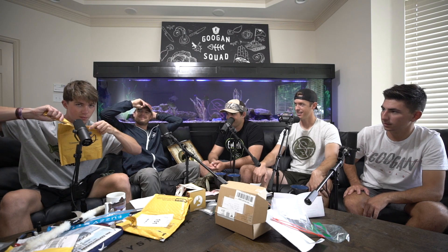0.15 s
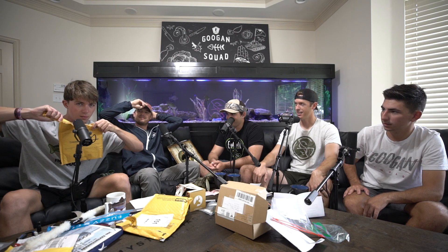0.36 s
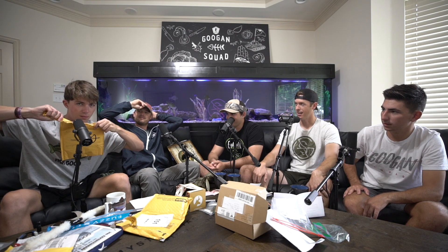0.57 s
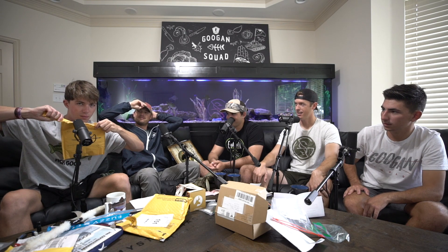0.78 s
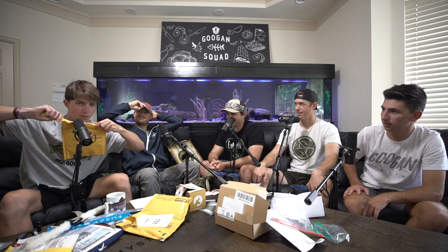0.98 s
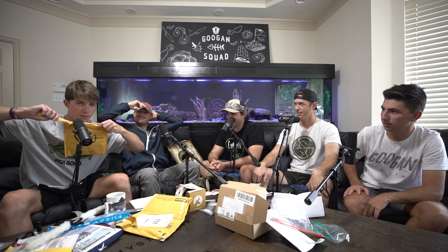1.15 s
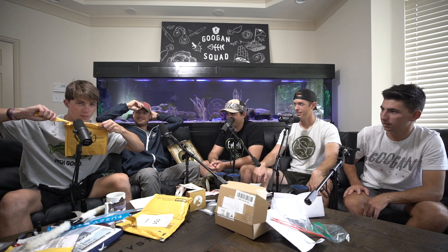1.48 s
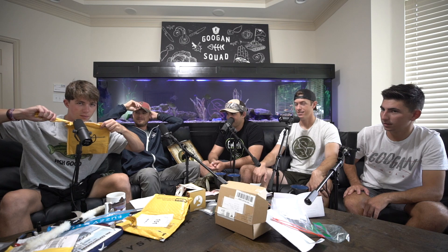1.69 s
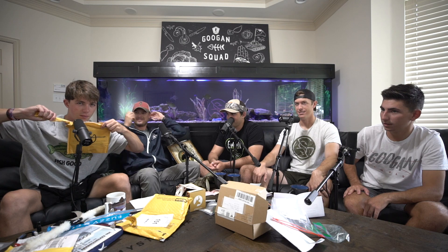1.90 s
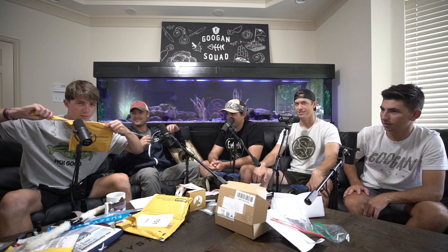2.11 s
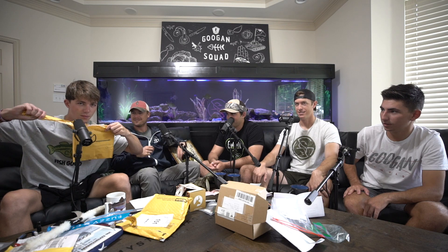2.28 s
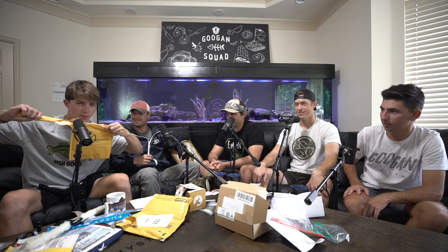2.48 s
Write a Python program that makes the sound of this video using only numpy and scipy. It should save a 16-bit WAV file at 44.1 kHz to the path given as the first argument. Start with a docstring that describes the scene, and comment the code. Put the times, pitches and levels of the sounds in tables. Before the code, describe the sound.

A paper envelope is picked at and torn open close up, crackling and ripping.

```python
"""A paper mailing envelope is torn open close to a microphone, over a low hum in a furnished room.
First fingers pick at it and knock its hollow body. From about 1.1 s it tears in a few pulls: fibres
break in a dense crackle, creases and glue let go in sharp snaps. Near 2.2 s the last pull rips the
strip away, and the loose sheet flaps air at the microphone."""
import sys
import numpy as np
from scipy import signal
from scipy.fft import rfft, irfft
from scipy.io import wavfile
from scipy.ndimage import uniform_filter1d

SR = 44100
rng = np.random.default_rng(int(sys.argv[2]) if len(sys.argv) > 2 else 0)


def output_pcm(signal):
    """Save a mono or channel-first signal as 16-bit PCM at the path in sys.argv[1].

    Samples are clipped to [-1, 1] before scaling.
    """
    pcm = np.clip(np.atleast_2d(signal).T, -1, 1) * 32767
    wavfile.write(sys.argv[1], SR, np.round(pcm).astype(np.int16))


N = 116865
BAND_LIMIT_HZ = 15900
LEAD_S = 0.002  # delay before a burst's onset


def amp(db):
    """Decibels to gain."""
    return 10 ** (np.asarray(db) / 20)


def unit_rms(x):
    """Scales to rms 1."""
    return x / np.sqrt(np.mean(x ** 2) + 1e-20)


def at_hz(points, hz):
    """Interpolates on a log-frequency axis."""
    freq_hz, value = np.transpose(points)
    return np.interp(np.log(hz + 1), np.log(freq_hz + 1), value)


def curve(table, column=1):
    """One column of a time table at every sample."""
    rows = np.array(table)
    return np.interp(np.arange(N) / SR, rows[:, 0], rows[:, column])


def add(mix, start_s, sound):
    """Mixes a sound in at start_s."""
    part = mix[max(round(start_s * SR), 0):][:len(sound)]
    part += sound[:len(part)]


def colour(x, spectrum, size=4096):
    """Minimum-phase filter from (freq_hz, gain_db) points."""
    log_gain = np.log(amp(at_hz(spectrum, abs(np.fft.fftfreq(size, 1 / SR)))))
    response = np.exp(np.conj(signal.hilbert(log_gain)))
    taps = np.fft.ifft(response).real[:size // 2]
    return signal.fftconvolve(x, taps)[:len(x)]


def burst(envelope, smooth_bins=130):
    """Whitened noise burst of about unit energy."""
    noise = rng.standard_normal(len(envelope)) * envelope
    bins = rfft(np.roll(noise, round(LEAD_S * SR)))
    return irfft(bins / np.sqrt(uniform_filter1d(abs(bins) ** 2, smooth_bins) + 1e-12))


def hum(pitch_hz=120.2, level_db=-54, octave_db=-75.5, waver_depth=0.008):
    """Electrical hum and its octave, wavering slightly in pitch."""
    waver = unit_rms(colour(rng.standard_normal(N), [(3, -10), (12, -10), (60, -71)], size=32768))
    phase = 2 * np.pi * np.cumsum(pitch_hz * (1 + waver_depth * waver)) / SR
    return np.sqrt(2) * (amp(level_db) * np.sin(phase) + amp(octave_db) * np.sin(2 * phase))


# Room air spectrum: freq_hz, gain_db
AIR_SPECTRUM = [(20, -17), (80, 11), (160, 2), (250, 4), (400, -13), (1000, -9.5), (4000, -9),
                (16000, -26)]


def room_air(level_db=-66.5):
    """Steady noise of the still room."""
    return amp(level_db) * unit_rms(colour(rng.standard_normal(N), AIR_SPECTRUM))


# Room decay: freq_hz, t60_s
ROOM_DECAY = [(150, 0.58), (1000, 0.48), (3500, 0.37), (8000, 0.49), (15000, 0.13)]


def reverb(x, gain_db=-19.5, onset_s=0.008, size=22016):
    """Short diffuse tail, dying fastest in the top treble."""
    hz, t, bins = signal.stft(rng.standard_normal(size), SR, nperseg=256)
    decay = amp(-60 * t / at_hz(ROOM_DECAY, hz)[:, None])
    tail = signal.istft(bins * decay * np.minimum(t / onset_s, 1), SR)[1]
    return amp(gain_db) * signal.fftconvolve(x, tail / np.linalg.norm(tail))[:N]


# Handling rumble: time_s, level_db
RUMBLE_LEVELS = [(0, -68), (.84, -69), (.89, -54), (1.15, -55), (1.4, -58), (1.65, -56), (2.12, -74),
                 (2.26, -36), (2.34, -45.5), (2.45, -38.5), (2.5, -49), (2.57, -42), (2.65, -51)]
# Rumble spectrum: freq_hz, gain_db
RUMBLE_SPECTRUM = [(10, 4), (28, -4.5), (70, -21.5), (150, -15), (300, -30), (1000, -52.5)]


def rumble():
    """Low noise of moving hands."""
    noise = unit_rms(colour(rng.standard_normal(N), RUMBLE_SPECTRUM, size=16384))
    return amp(curve(RUMBLE_LEVELS)) * noise


def swing(pitch_hz, level_db, swell_s, size=6000):
    """Heavily damped swing of the whole sheet."""
    t = np.arange(size) / SR
    envelope = t / swell_s * np.exp(1 - t / swell_s)
    return amp(level_db) * envelope * np.sin(2 * np.pi * pitch_hz * t)


# Sheet flaps: start_s, pitch_hz, level_db, swell_s
FLAPS = [(2.228, 114, -19.5, 0.0028), (2.237, 50, -19.5, 0.011), (2.257, 110.3, -21, 0.0075),
         (2.266, 66.4, -33, 0.0091), (2.304, 54, -33.5, 0.0087), (2.355, 77, -35, 0.007),
         (2.425, 30, -33, 0.01), (2.442, 35.7, -29, 0.0076), (2.591, 21.9, -38.5, 0.009)]


def flaps():
    """The loose sheet pushes air at the microphone."""
    out = np.zeros(N)
    for start_s, pitch_hz, level_db, swell_s in FLAPS:
        add(out, start_s, swing(pitch_hz, level_db, swell_s))
    return out


# Finger knocks: start_s, pitch_hz, thump_db, swell_s, tap_db, tap_freq_ratio
KNOCKS = [(0.069, 170, -43, 0.001, -27.5, 3.1), (0.098, 141, -40, 0.0029, -24, 1.3),
          (0.124, 221, -42, 0.0022, -20.5, 0.94), (.134, 100, -40, 0.0038, -28, 1.1),
          (0.197, 185, -41, 0.0021, -20, 1.18), (.218, 129, -38, 0.0026, -20, 1.16),
          (0.252, 63, -34.5, 0.0032, -50, 1), (.268, 113, -34, 0.0032, -25, 2),
          (0.296, 252, -33, 0.00079, -15, 1.16), (.333, 113, -36.5, 0.0014, -19.5, 1.7),
          (.387, 260, -41, 0.00083, -19, 2), (.88, 90, -36.5, 0.0011, -16.5, 1.38),
          (1.126, 117, -30, 0.0022, -2.5, 0.28), (1.166, 124, -27, 0.0022, -24, 0.45),
          (1.214, 109, -44, 0.0067, -30, 1.2), (1.309, 152, -30.5, 0.0022, -13.5, 0.76),
          (1.413, 553, -39.5, 0.0017, -20, 1.7), (2.052, 84, -37.5, 0.0058, -22, 1.5),
          (2.198, 290, -35, 0.0023, -13, 1.5), (2.253, 340, -35, 0.0021, -9, 0.48),
          (2.356, 110, -51, 0.0024, -24, 1), (2.387, 300, -44.5, 0.0041, -28, 0.79),
          (2.422, 252, -44, 0.0019, -13.5, 0.9), (2.555, 268, -29.5, 0.00086, -10.5, 0.87),
          (2.561, 139, -36.5, 0.0029, -20.5, 0.71)]
# Tap spectrum at ratio 1: freq_hz, gain_db
TAP_SPECTRUM = [(60, -9), (300, -1.5), (600, 6.5), (950, -0.5), (1600, -9), (5000, -37), (16000, -55)]


def knocks(tap_decay_s=0.0014, size=2048):
    """Fingers knock and flex the hollow envelope: a thump plus a noisy tap."""
    out, t = np.zeros(N), np.arange(size) / SR
    for start_s, pitch_hz, thump_db, swell_s, tap_db, tap_freq_ratio in KNOCKS:
        add(out, start_s, swing(pitch_hz, thump_db, swell_s))
        tap = burst(np.exp(-t / tap_decay_s), smooth_bins=28)
        spectrum = np.array(TAP_SPECTRUM) * [tap_freq_ratio, 1]
        add(out, start_s - LEAD_S, amp(tap_db) * colour(tap, spectrum))
    return out


# Sheet bending modes: freq_hz
SHEET_MODES_HZ = [780, 2300, 5300, 8600, 13000]


def sheet_ring(crack, q=4.02, detune_ratio=0.079, lift_db=1.5, spread_db=2):
    """A crack lingers in the bending modes, shifted and weighted anew by each crease."""
    for hz in SHEET_MODES_HZ:
        shift, weight = rng.uniform(-1, 1, 2)
        mode = signal.iirpeak(hz * (1 + detune_ratio * shift), q, fs=SR)
        ring = signal.lfilter(*mode, crack)
        crack = crack - (1 + amp(lift_db + spread_db * weight)) * ring
    return crack


# Paper snaps: start_s, level_500hz_db, level_2khz_db, level_6khz_db, level_12khz_db
SNAPS = [(0.1329, -15, -15, -23, -50), (0.2696, -6, -18.5, -19, -25), (0.299, -20, -20, -20, -26),
         (0.3114, -12, -4, -11, -26), (0.481, -37, -19, -24, -22), (0.5527, -10, -17.5, -2.5, -22.5),
         (0.5612, -15, -22, -27, -21), (0.5923, -7.5, -12.5, -6.5, -6), (0.6408, -19, -23.5, -21, -23.5),
         (0.782, -29, -24, -24, -24.5), (0.8112, -46, -33, -25, -24.5), (0.8544, -52, -32, -18, -28),
         (0.8697, -40, -28, -23, -28), (0.9622, -28, -12, -42, -27), (0.9918, -15, -14, -14, -16),
         (1.0739, -38, -13, -20, -25), (1.0847, -19, -8.5, -8, -15), (1.1094, -18, -3, 0.5, -2),
         (1.1266, 8, 7.5, 1, -12), (1.1321, 1, -3, -3, -9), (1.1567, -4.5, -17, -5, -12),
         (1.1637, -7, 9, -6.5, -21), (1.1652, -10, 5.5, -20, -17), (1.1796, -10, -9, -8, -12),
         (1.1842, -17, -14, -3, -14.5), (1.196, -20, -9, -16, -17), (1.3094, -8.5, -10, -27.5, -36),
         (1.4464, -6.5, -12, -9.5, -22), (1.4623, -6.5, -8, -15, -17), (1.469, -5, -12.5, -16, -13),
         (1.6838, -25, -42, -17.5, -15.5), (1.6993, -29, -13, -25, -23), (1.7097, -6.5, -14.5, -27, -17),
         (1.7435, -4, -10.5, -20.5, -30), (1.8022, -33, -35, -15, -26), (1.8054, -20, -11, -26, -32),
         (1.826, -21, -14.5, -6, -23), (1.849, -48, -65, -13.5, -31), (1.976, -65, -19.5, -15, -29),
         (2.002, -33, -42, -19, -18), (2.051, -41, -11, -17, -21), (2.113, -10.5, -8, -16, -20),
         (2.1159, -10, -11, -0.5, -12.5), (2.118, -13, -6.5, -10, -15), (2.1622, -23, -4, -2, -33),
         (2.168, -18, 5.5, -2, -37), (2.1923, -22, 0, -4.5, -21), (2.199, -5, 6, -2.5, -9),
         (2.2335, -18, 1, 1, -23), (2.2524, 7, 1, -3, -9), (2.2545, -7.5, 0.5, -3, -11),
         (2.2684, -3, -5, -7.5, -10.5)]
# Snap bands: freq_hz
SNAP_BANDS_HZ = [500, 2000, 6000, 12000]


def snaps(gain_db=-2, chatter_db=-9, chatter_s=0.0013, size=2048):
    """Creases and glue give way in a click and a brief chatter."""
    out, t = np.zeros(N), np.arange(size) / SR
    click = signal.unit_impulse(size, round(LEAD_S * SR))
    for start_s, *bands_db in SNAPS:
        chatter = amp(chatter_db) * burst(np.sqrt(t) * np.exp(-t / chatter_s))
        spectrum = [(30, bands_db[0] - 6), (200, bands_db[0] + 2.5), *zip(SNAP_BANDS_HZ, bands_db)]
        add(out, start_s - LEAD_S, colour(sheet_ring(click + chatter), spectrum))
    return amp(gain_db) * out


# Colour bands of a fibre break: freq_hz
BREAK_BANDS_HZ = [400, 800, 1400, 2200, 3200, 4500, 6000, 8000, 10500, 13000, 16000]


def fibre_break(decay_s=0.00014, spread_db=6.5, size=256):
    """Tiny crack, coloured at random by its spot on the sheet."""
    crack = rng.standard_normal(size) * np.exp(-np.arange(size) / SR / decay_s)
    tint_db = spread_db * np.clip(rng.standard_normal(len(BREAK_BANDS_HZ)), -2, 2)
    return unit_rms(colour(crack, np.transpose([BREAK_BANDS_HZ, tint_db]), size=512))


REF_DB = -51  # level at which fibres break at ref_per_s


def fibres(level_db, spectrum, ref_per_s, spread_db, gain_db, rub_db, growth_per_db=0.31, spots=24):
    """Breaks of uneven size, denser the harder the pull, over smooth rubbing."""
    rate_per_s = ref_per_s * np.exp(growth_per_db * (level_db - REF_DB))
    sizes = amp(spread_db * np.minimum(rng.exponential(1, N), 5)) * rng.choice([-1, 1], N)
    breaks = sizes * (rng.random(N) < rate_per_s / SR)
    local_power = abs(uniform_filter1d(breaks ** 2, 1100))
    breaks = breaks / np.sqrt(local_power + 0.00099)
    spot = rng.integers(0, spots, N)
    grains = sum(signal.oaconvolve(breaks * (spot == k), fibre_break())[:N] for k in range(spots))
    rubbing = amp(rub_db) * rng.standard_normal(N)
    return amp(level_db + gain_db) * unit_rms(colour(unit_rms(grains) + rubbing, spectrum))


# Tearing and crinkling: time_s, rustle_db, crackle_db
TEAR_LEVELS = [(0, -59.5, -59), (0.06, -71, -66.5), (0.115, -51.5, -58), (0.18, -61.5, -58),
               (0.245, -59, -61.5), (0.28, -56.5, -49.5), (0.33, -51.5, -52.5), (0.38, -62.5, -59.5),
               (0.46, -65.5, -66), (0.54, -71.5, -65), (0.6, -58, -57), (0.7, -62.5, -57.5),
               (0.8, -64.5, -60.5), (0.93, -66.5, -61.5), (1.02, -51.5, -51), (1.115, -53.5, -57),
               (1.15, -39.5, -39.5), (1.185, -41, -39), (1.215, -53.5, -61), (1.28, -59, -73.5),
               (1.35, -64, -64.5), (1.41, -47, -52), (1.47, -46, -48), (1.52, -66, -60), (1.61, -70, -62),
               (1.65, -67, -61), (1.7, -54.5, -50.5), (1.77, -58, -54), (1.81, -58.5, -51.5),
               (1.87, -68.5, -63.5), (1.95, -65, -59.5), (2.03, -60, -55.5), (2.06, -50, -46.5),
               (2.1, -58.5, -54), (2.143, -50, -42), (2.153, -42, -37.5), (2.165, -39.5, -40),
               (2.173, -47.5, -39), (2.18, -33, -37), (2.185, -30.5, -40), (2.191, -34.5, -38),
               (2.196, -42, -50), (2.203, -38, -36), (2.21, -43, -40), (2.222, -35, -33.5),
               (2.265, -35.5, -34.5), (2.277, -42.5, -44.5), (2.29, -51.5, -48), (2.35, -52.5, -58),
               (2.41, -51, -49), (2.46, -60.5, -66.5), (2.53, -64.5, -62.5), (2.59, -60.5, -56.5),
               (2.65, -64.5, -64)]
# Rustle, crackle and fizz spectra: freq_hz, gain_db
RUSTLE_SPECTRUM = [(40, 6), (130, 10), (260, 5.5), (480, -1), (950, -3), (1700, 0), (2700, -1),
                   (4000, -0.5), (6500, -30), (16000, -42)]
CRACKLE_SPECTRUM = [(500, -31.5), (2000, -8), (3800, -2), (5300, 3.5), (6150, 1), (6650, -3.5), (7200, 1),
                    (8800, 1), (10500, -5), (13500, -9), (16000, -15.5)]
FIZZ_SPECTRUM = [(3000, -46), (7000, -21), (9000, 5), (10800, -22), (12500, 3), (14500, 3), (16000, -4)]


def tearing(fizz_db_per_db=1.24, surge_db=1.5, surges_per_s=150):
    """Sheet rustle, fibre crackle and fine fizz surge together as the tear sticks and runs on."""
    rustle_db, crackle_db = curve(TEAR_LEVELS, column=1), curve(TEAR_LEVELS, column=2)
    fizz_db = REF_DB + fizz_db_per_db * (crackle_db - REF_DB)
    rustle = fibres(rustle_db, RUSTLE_SPECTRUM, ref_per_s=4995, spread_db=4.5, gain_db=-0.5, rub_db=-4)
    crackle = fibres(crackle_db, CRACKLE_SPECTRUM, ref_per_s=6507, spread_db=4.5, gain_db=-1, rub_db=-9)
    fizz = fibres(fizz_db, FIZZ_SPECTRUM, ref_per_s=9000, spread_db=13, gain_db=-9.5, rub_db=-1)
    surge = np.interp(np.arange(N) / SR * surges_per_s, np.arange(N), rng.standard_normal(N))
    return (rustle + crackle + fizz) * amp(surge_db * surge)


def scene():
    """Mono mix of paper, its reverb, handling and background."""
    paper = snaps() + tearing()
    tail = reverb(paper)
    handling = knocks() + flaps() + rumble()
    background = hum() + room_air()
    return (paper + tail + handling + background)[None]


def record(dry):
    """The recorder's band limit."""
    lowpass = signal.firwin(255, BAND_LIMIT_HZ, window=("kaiser", 8), fs=SR)
    return signal.oaconvolve(dry, lowpass[None], "same")


dry = scene()
out = record(dry)
output_pcm(out)
```